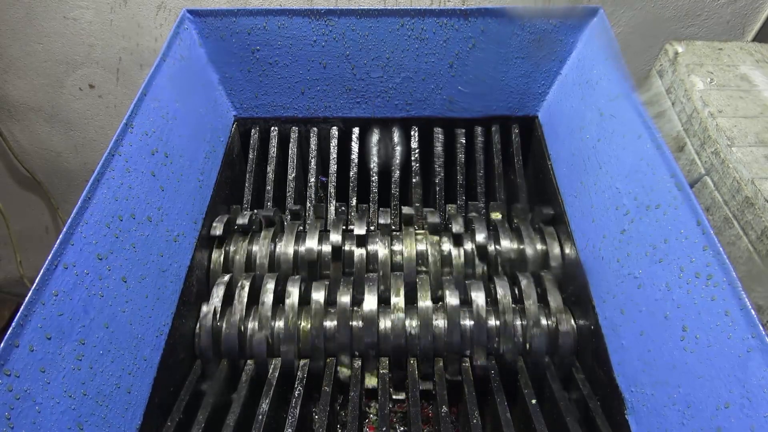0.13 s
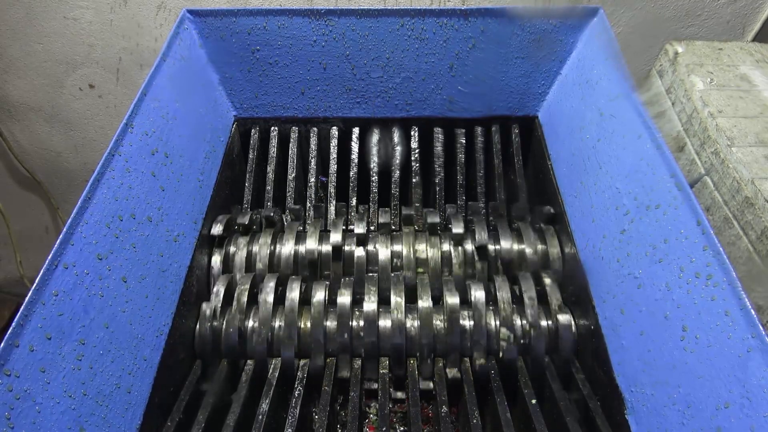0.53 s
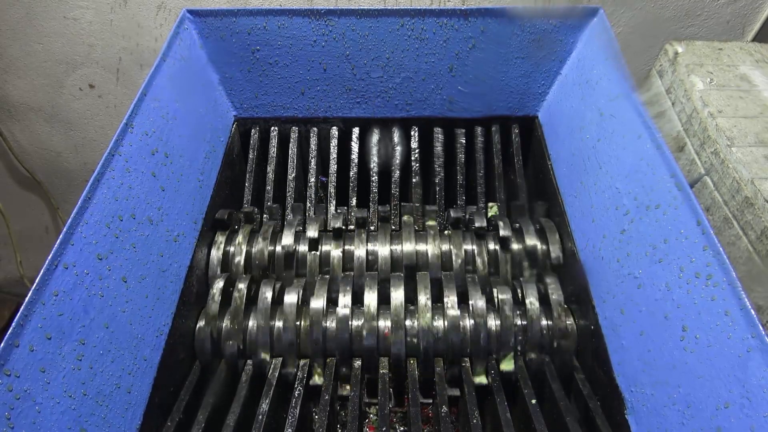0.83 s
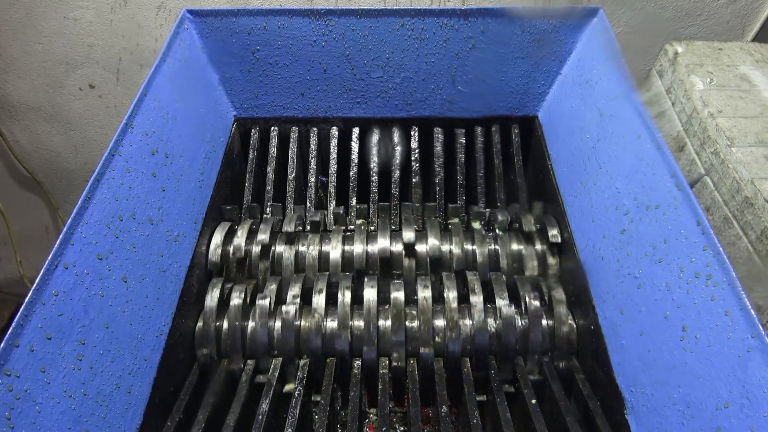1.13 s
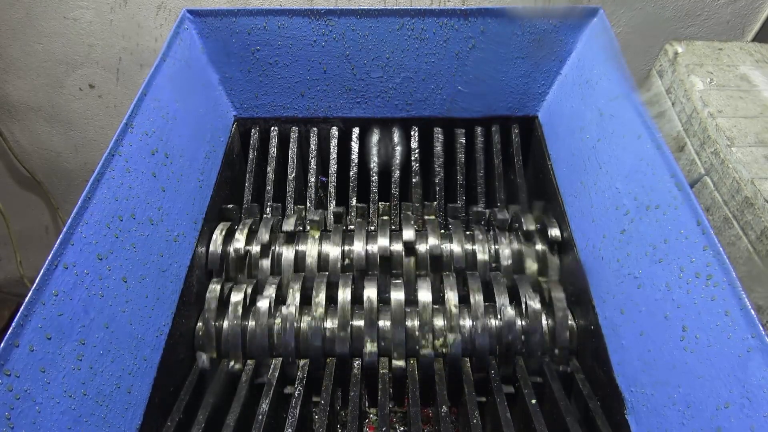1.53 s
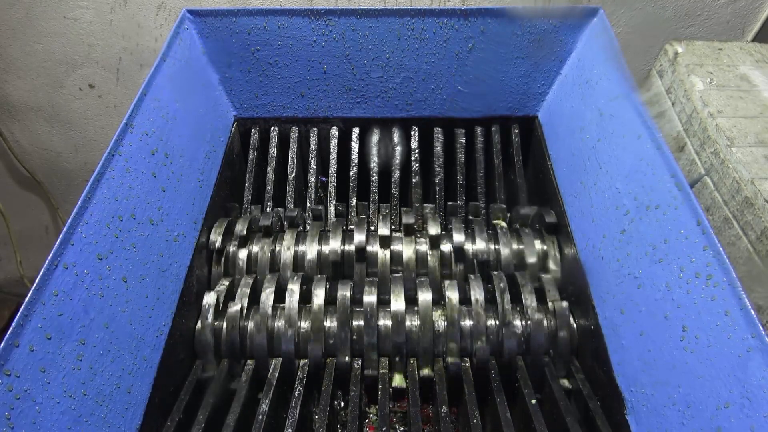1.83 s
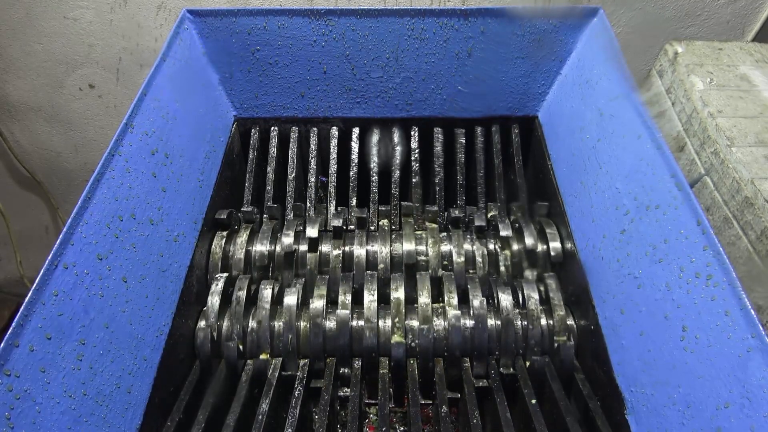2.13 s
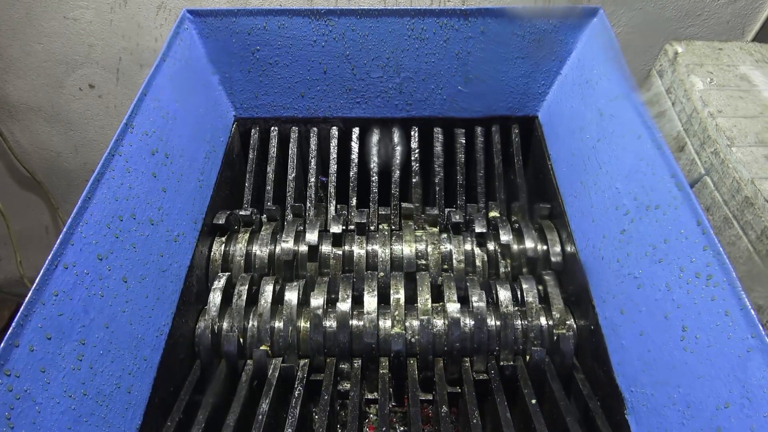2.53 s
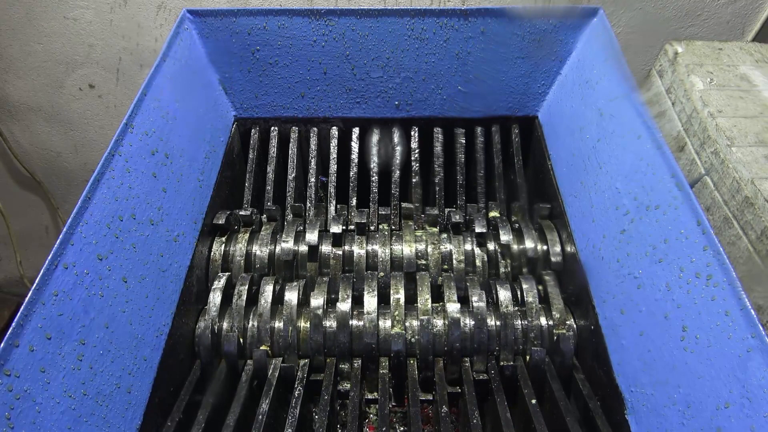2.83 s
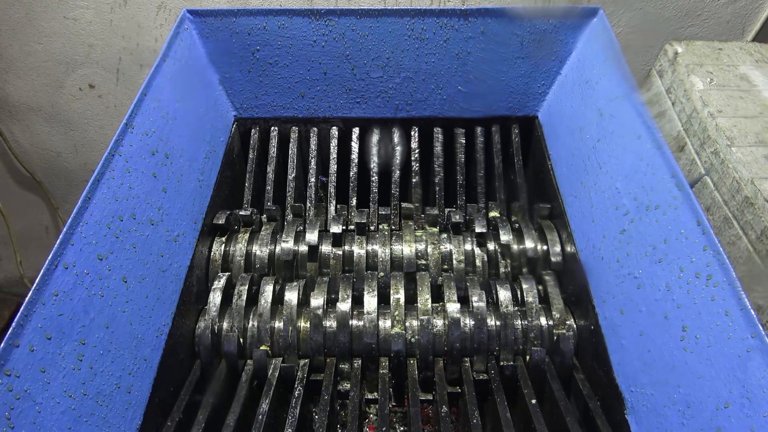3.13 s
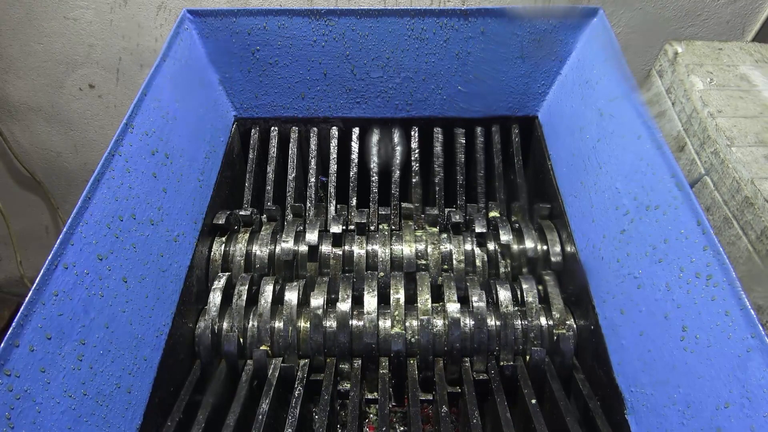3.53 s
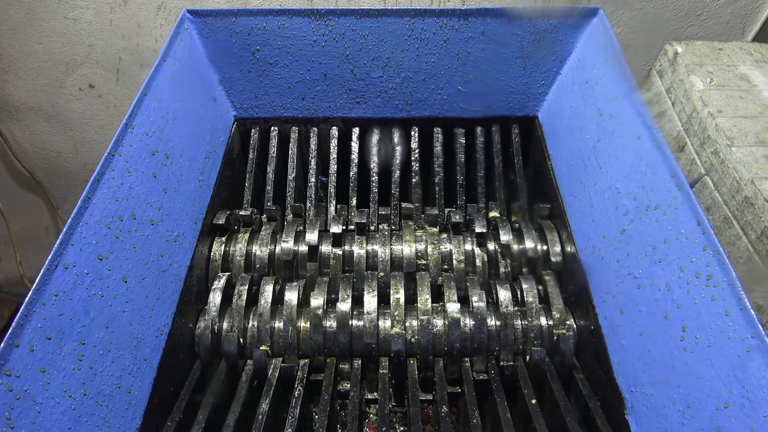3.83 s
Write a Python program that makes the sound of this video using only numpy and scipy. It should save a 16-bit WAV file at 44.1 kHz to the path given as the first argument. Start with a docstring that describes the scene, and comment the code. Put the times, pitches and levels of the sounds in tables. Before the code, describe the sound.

An industrial shredder runs empty in a workshop, heard close: throbbing motor hum, gear whine, rough grinding, metallic squeals and bright cutter snaps, the sharpest near 1.4 s. At about 1.9 s power cuts with heavy clunks; the pitch sags and slack gears chatter until 2.4 s. Quiet room noise remains with faint low hum and rustles, a soft knock at 3.0 s, and a fainter knock with a shuffle at 3.9 s.

```python
"""A twin-shaft shredder runs empty in a workshop: wavering sines make the motor and gear whine, shaped noise
the grinding roar and the scraping, narrow noise bands the squeals, short bright bursts the snapping cutters.
Just before two seconds the power is cut: the frame clunks, the tones sag and die, slack gear teeth chatter.
Then a quiet room of soft noise is left, with faint rustles and low humming sines.
Two soft knocks ring a panel's modes, the second amid a shuffle of noise at the end."""
import sys
import numpy as np
from scipy import signal
from scipy.fft import rfft, irfft, next_fast_len
from scipy.io import wavfile
from scipy.ndimage import uniform_filter1d, map_coordinates

SR = 44100
rng = np.random.default_rng(int(sys.argv[2]) if len(sys.argv) > 2 else 0)


def output_pcm(signal):
    """Save a mono or channel-first signal as 16-bit PCM at the path in sys.argv[1].

    Samples are clipped to [-1, 1] before scaling.
    """
    pcm = np.clip(np.atleast_2d(signal).T, -1, 1) * 32767
    wavfile.write(sys.argv[1], SR, np.round(pcm).astype(np.int16))


N = 176400
T = np.arange(N) / SR  # time of each sample, seconds


def amp(db):
    """Turn decibels into a plain gain."""
    return 10 ** (np.asarray(db) / 20)


def unit(x):
    """Scale a signal to an rms of 1."""
    return x / np.sqrt(np.mean(x ** 2) + 1e-20)


def along(points, hz):
    """Read a curve of (Hz, value) points, joined by straight lines on a log frequency axis."""
    point_hz, value = np.transpose(points)
    return np.interp(np.log(hz + 1), np.log(point_hz + 1), value)


def curves(rows, outside=None):
    """Join the rows in time, one curve per column; outside them use the given value or hold the end ones."""
    seconds, *columns = np.transpose(rows)
    return [np.interp(T, seconds, column, outside, outside) for column in columns]


def wobble(rate):
    """A smooth random curve, with rate new random points a second."""
    points = rng.standard_normal(int(N * rate / SR) + 4)
    return map_coordinates(points, [T * rate])


def filtered(x, response):
    """Multiply the spectrum of x by a response, which is a function of frequency in Hz."""
    size = next_fast_len(N + SR // 2)
    hz = np.fft.rfftfreq(size, 1 / SR)
    return irfft(rfft(x, size) * response(hz), size)[..., :N]


# How alike left and right noise are. Each row: frequency in Hz, likeness (1 same, 0 unrelated, below 0 opposed).
ALIKE = [(600, .98), (800, .86), (1050, .98), (2500, .76), (4200, .97), (5500, .9), (7200, .2), (8500, .35),
         (11000, -.1)]


def rush(spectrum, patchy_db):
    """Stereo noise of rms 1, coloured by a spectrum, with random louder and softer patches."""
    cells = signal.stft(rng.standard_normal((2, N)), nperseg=512)[2]
    patches = rng.standard_normal(cells.shape[1:])
    patches = uniform_filter1d(patches, 4, 0)  # smooth over frequency
    patches = uniform_filter1d(patches, 8, 1)  # smooth over time
    pair = signal.istft(cells * amp(patchy_db * unit(patches)), nperseg=512)[1][:, :N]

    def mid_side(hz):
        # a larger angle gives more side signal, so less likeness
        angle = np.arccos(np.clip(along(ALIKE, hz), -1, 1)) / 2
        return amp(along(spectrum, hz)) * [np.cos(angle), np.sin(angle)]

    mid, side = filtered(pair, mid_side)
    return unit(np.array([mid + side, mid - side]))


def tone(hz, waver_db, rate, drift):
    """A sine of rms about 1 whose level (dB) and phase (radians) waver at random."""
    cycles = np.cumsum(hz + 0 * T) / SR + rng.random()
    phase = 2 * np.pi * cycles + drift * wobble(rate)
    return np.sqrt(2) * amp(waver_db * wobble(rate)) * np.sin(phase)


def strike(events, modes, rise_s=0.0021, rough=0.0416):
    """Every blow rings the modes anew, each with an unsteady phase; brighter blows favour the upper modes."""
    out, t = np.zeros(N + SR), T[:SR // 3]
    for start, db, bright_db in events:
        ring = 0
        for hz, mode_db, t60 in modes:
            octaves = np.log2(hz / modes[1][0])  # counted from the second mode
            level = mode_db + bright_db * octaves + rng.normal(0, 1.67) - 60 * t / t60
            stray = uniform_filter1d(np.cumsum(rng.normal(0, rough, len(t))), size=120)
            ring = ring + amp(level) * np.sin(2 * np.pi * hz * t + stray)
        out[round(start * SR):][:len(t)] += amp(db) * (1 - np.exp(-t / rise_s)) * ring
    return out[:N]


SHAFT_HZ = 24.8  # turns per second before the cut
CUT_S, MOTOR_T60, WHINE_T60 = 1.941, 0.98, 0.49  # power cut, then seconds to fall by 60 dB
SAG_PER_S = 0.16  # share of pitch lost per second after the cut
SHAFT_WAVER_DB, SHAFT_DRIFT = 1.2, .15  # level in dB, phase in radians
WHINE_WAVER_DB, WHINE_DRIFT = 1.2, .45
BEAT_HZ, BEAT_DEPTH = 11, 0.24  # the whine throbs as the cutter hooks load the gears
# Motor shaft tones. Each row: multiple of the shaft speed, level in dB before the load.
ORDERS_DB = [(4, -47), (5, -36), (6, -46.5), (8, -53.5), (9, -36.5), (10, -45.5), (11, -46), (13, -47.5),
             (14, -48), (15, -49), (17, -49), (22, -46.5), (23, -47.5), (24, -42), (27, -56)]
# Magnetic hum of the motor. Each row: frequency in Hz, level in dB while powered.
MAINS = [(299.7, -42)]
# Gear tooth tones. Each row: frequency in Hz before the cut, level in dB before the load.
WHINE = [(920.5, -54), (1015.3, -38.5), (1077.5, -39.5), (1170, -50.5), (1276, -53), (1600, -47.5),
         (1685, -52), (1842, -71), (2166, -53), (2186, -61.5), (3768, -57), (4511, -62.5)]
# How the load moves the levels. Each row: time in seconds, change of the shaft tones in dB, of the whine in dB.
LOAD = [(0, -2, 1), (.15, -1.5, 0.5), (.5, -0.3, -1), (.75, 0, 3), (1.0, 0.5, -1.5), (1.2, 1, 0),
        (1.45, -3.1, 0.5), (1.9, -1.3, 0)]


def motor():
    """Shaft and gear tones follow the turning speed, so they sag after the cut; all tones and hum die away."""
    off = np.maximum(T - CUT_S, 0)  # seconds since the cut
    speed = 1 - SAG_PER_S * off
    shaft_load_db, whine_load_db = curves(LOAD)
    low, whine = 0, 0
    for multiple, db in ORDERS_DB:
        hz = multiple * SHAFT_HZ * speed
        low = low + amp(db + shaft_load_db) * tone(hz, SHAFT_WAVER_DB, 4.05, SHAFT_DRIFT)
    for hz, db in MAINS:
        low = low + amp(db) * tone(hz, SHAFT_WAVER_DB, 4.55, SHAFT_DRIFT)
    for hz, db in WHINE:
        beat_phase = 2 * np.pi * (BEAT_HZ * T + rng.random()) + wobble(3.27)
        beat = 1 + BEAT_DEPTH * np.sin(beat_phase)
        whine = whine + amp(db + whine_load_db) * beat * tone(hz * speed, WHINE_WAVER_DB, 16, WHINE_DRIFT)
    return low * amp(-60 * off / MOTOR_T60) + whine * amp(-60 * off / WHINE_T60)


RUMBLE_DB, GRIND_DB = -13, -3  # added to those two levels
# The roar over time, before the trims above and the fade.
# Each row: time in seconds, level of the rumble in dB, of the grinding in dB, of the hiss in dB.
ROAR = [(0.0, -49, -32, -48), (0.16, -25, -32, -49.5), (0.28, -28, -32.5, -45), (0.47, -23.5, -34.5, -51),
        (0.66, -36, -32, -49.5), (1.1, -28.5, -34.5, -48.5), (1.18, -23, -33.5, -47.5),
        (1.59, -27.5, -30, -49.5), (1.89, -22.5, -35, -47.5), (1.95, -29, -32, -47), (2.13, -44, -33, -56),
        (2.15, -33.5, -36.5, -58), (2.28, -34.5, -42.5, -63.5), (2.37, -33, -46.5, -70),
        (2.48, -44, -55, -84), (2.57, -48, -59, -74), (2.8, -51, -67, -94)]
# Colours of the three noises. Each row: frequency in Hz, relative strength in dB per Hz.
RUMBLE = [(15, -39), (30, -18), (55, -13.5), (85, -11.5), (150, -6.5), (181, -7.5), (230, -1.5), (310, -5),
          (400, -4), (480, -8), (600, -39), (900, -120)]
GRIND = [(220, -54), (380, -21.5), (461, -12), (577, -4), (712, -14.5), (816, -17.5), (936, -12),
         (1010, -6), (1050, 1.5), (1100, -10.5), (1180, -8), (1430, -14.5), (1630, -10), (1960, -15.5),
         (2230, -23.5), (2600, -31), (3380, -41), (5720, -120)]
HISS = [(1410, -20), (2400, -5.5), (2710, -6.5), (3250, -9), (3810, -2), (4280, -1), (4640, -9.5),
        (5230, -8), (7000, -15), (9100, -82), (15400, -120)]


def roar():
    """Many small rough contacts add up to noise: rumble, grinding and hiss, the last two fluttering fast."""
    rumble_db, grind_db, hiss_db = curves(ROAR)
    fade = amp(-60 * np.maximum(T - 2.55, 0) / 1.2)

    def throb(depth):
        return 1 + depth * np.sin(2 * np.pi * 3.3 * SHAFT_HZ * T + wobble(4.83))

    rumble = amp(rumble_db + RUMBLE_DB) * rush(RUMBLE, patchy_db=2.0)
    grinding = amp(grind_db + GRIND_DB) * throb(0.064) * rush(GRIND, patchy_db=2.0)
    hiss = amp(hiss_db) * throb(0.045) * rush(HISS, patchy_db=2.0)
    return fade * (rumble + grinding + hiss)


SNAP_T60, SNAP_TAIL_DB, SNAP_RISE_S = .03, -8, .004  # ring decay in seconds, burst level, burst rise
# Cutters rubbing. Each row: time in seconds, level in dB before a small random wobble.
SCRAPE = [(0.0, -60.5), (0.13, -57.5), (0.33, -46), (0.49, -50), (0.56, -54), (0.67, -51), (1.15, -59),
          (1.88, -56), (1.98, -48), (2.31, -74.5), (2.4, -83)]
# Colour of the rubbing steel. Each row: frequency in Hz, relative strength in dB per Hz.
STEEL = [(3820, -33.5), (6500, -3.5), (6800, -2.5), (8430, 0), (8880, -12), (10100, -10), (11200, -8),
         (11900, -10), (13300, -15), (15000, -7), (15800, -29)]
# Cutters snapping past each other. Each row: time in seconds, base level in dB, pitch of the ring in Hz.
SNAPS = [(0.268, -35.5, 7040), (0.344, -38.5, 8930), (0.4228, -31, 8560), (0.6315, -40, 7900),
         (0.745, -40, 7680), (1.0026, -42.5, 7030), (1.411, -25.5, 8700), (1.7765, -48, 7000),
         (1.9272, -34, 8950), (1.9515, -33.5, 7840), (1.985, -41.5, 7850)]


def cutters():
    """Discs rub in gritty patches of noise; each snap is a short ringing sine and a burst of noise."""
    [level_db] = curves(SCRAPE, -120)
    rub = amp(level_db + 0.84 * wobble(120)) * rush(STEEL, patchy_db=8.5)
    burst, ring = np.zeros(N), np.zeros(N)
    for start, db, hz in SNAPS:
        t = np.maximum(T - start, 0)
        ring_level = (1 - np.exp(-t / 0.0003)) * amp(db + 1.0 - 60 * t / SNAP_T60)
        ring += ring_level * np.sin(2 * np.pi * hz * t)
        swell = np.exp(np.minimum(T - start, 0) / SNAP_RISE_S)  # the noise grows up to the snap
        burst += swell * amp(db + SNAP_TAIL_DB - 60 * t / 0.2)
    return rub + ring + burst * rush(STEEL, patchy_db=4.0)


SQUEAL_DB = -5.5  # added to every squeal level
# Narrow metallic squeals. Each row: frequency in Hz, width in Hz.
SQUEAL_BANDS = [(515, 44), (1640, 115), (1845, 22), (3740, 140), (4550, 193)]
# How they come and go. Each row: time in seconds, then the level of each band in dB before the trim above.
SQUEAL = [(0.0, -68, -32, -32, -59, -56), (0.32, -43.5, -39.5, -42.5, -48.5, -44.5),
          (0.89, -33.5, -44, -42.5, -56, -52), (1.11, -39, -47, -52, -52, -74),
          (1.48, -38, -34.5, -43, -45, -46), (1.84, -49, -37.5, -42, -47, -52.5),
          (1.99, -44, -47, -57, -63, -41), (2.05, -30.5, -34.5, -45, -80, -50.5),
          (2.21, -40, -42, -76, -67, -60), (2.25, -37, -77, -75, -76, -61), (2.4, -62, -72, -81, -91, -74)]


def squeals():
    """Rubbing steel sings in a few narrow bands: noise through resonances, each with its own level curve."""
    out = 0
    for (centre, width), level_db in zip(SQUEAL_BANDS, curves(SQUEAL, -120)):
        def resonance(hz):
            return (hz * width / (centre ** 2 - hz ** 2 + 1j * hz * width)) ** 2

        band = filtered(rng.standard_normal(N), resonance)
        out = out + amp(level_db + SQUEAL_DB) * unit(band)
    return out


TOOTH_RISE_S, KNOCK_ROUGH = .005, .09  # rise in seconds, phase unsteadiness in radians per sample
# Clunks of the frame. Each row: time in seconds, level in dB, brightness in dB per octave.
CLUNKS = [(1.924, -21, -2), (1.937, -19.5, -2), (1.962, -19.5, -0.5), (1.985, -24.5, 2), (2.005, -38, 6),
          (2.027, -24.5, 1)]
# Ringing modes of the frame. Each row: frequency in Hz, relative level in dB, seconds to fall by 60 dB.
FRAME = [(132.7, -16.5, 0.67), (184.7, -1.5, 0.2), (220, -8.5, 0.22), (315, -4, 0.098), (607, -6, 0.12),
         (651, -11, 0.11), (740, -7.5, 0.1), (874, -13, 0.1)]
# Slack gear teeth knocking. Each row: time in seconds, level in dB, brightness in dB per octave.
TEETH = [(2.030, -27, -5), (2.052, -24.5, 0), (2.095, -35, 5), (2.107, -24, -15), (2.127, -23.5, -3),
         (2.166, -30, 0.5), (2.195, -33, 5), (2.235, -27, 1), (2.255, -27, 2), (2.277, -29.5, 7.5),
         (2.320, -30, -8), (2.400, -40, 1)]
# Ringing modes of the casing. Each row: frequency in Hz, relative level in dB, seconds to fall by 60 dB.
CASING = [(435, -9, 0.085), (508.3, 0, 0.14), (558, -10, 0.15), (1049, -4, 0.13), (1630, -22, 0.089)]


def stopping():
    """Blows ring the metal: the frame clunks, then slack gear teeth knock the casing."""
    clunks = strike(CLUNKS, FRAME)
    chatter = strike(TEETH, CASING, TOOTH_RISE_S, KNOCK_ROUGH)
    return clunks + chatter


# Two soft knocks. Each row: time in seconds, level in dB, brightness in dB per octave.
KNOCKS = [(3.0295, -36, 5.5), (3.906, -58, 0)]
# Ringing modes of the panel. Each row: frequency in Hz, relative level in dB, seconds to fall by 60 dB.
PANEL = [(420, -9, .45), (465, -12, .55), (515, -11, .4), (510, 0, .05), (1000, -18, .2)]


def knocks():
    """Two blows make a panel ring in its own modes."""
    return strike(KNOCKS, PANEL, rough=KNOCK_ROUGH)


# Two humming tones. Each row: time in seconds, frequency in Hz, level in dB before a slight waver.
HUM = [(2.55, 134.2, -58), (2.828, 130.6, -65.5), (2.868, 122.6, -54), (2.948, 123, -80),
       (3.002, 130, -56.5), (3.092, 130.7, -67), (3.45, 125.2, -58), (3.61, 124, -54.5),
       (3.754, 122.8, -59), (3.85, 124, -69)]
LOW_HUM = [(2.3, 95.4, -57), (2.5, 97, -58), (2.6, 95.5, -68), (2.9, 94.6, -60.5), (2.97, 94, -71),
           (3.17, 87, -67), (3.5, 79.8, -67), (3.6, 80.3, -88)]


def far_hum():
    """Two low, far hums whose pitch wanders, on the whole downward."""
    out = 0
    for rows in (HUM, LOW_HUM):
        hz = curves(rows)[0]
        level_db = curves(rows, -120)[1]
        out = out + amp(level_db) * tone(hz, waver_db=1, rate=6, drift=.1)
    return out


ROOM_DB, SHUFFLE_LOW_DB = -57.5, -4  # room noise level, trim of the low shuffle
RUSTLE_S, LOOSE_PATCHY_DB = .017, 1  # half-length of a rustle in seconds, unevenness in dB
# Faint rustles. Each row: time in seconds, level in dB at its height.
RUSTLES = [(2.56, -74), (2.92, -73), (3.14, -69), (3.2, -72), (3.325, -68), (3.41, -70), (3.47, -73),
           (3.555, -71), (3.86, -70)]
# The shuffle. Each row: time in seconds, level of its low part in dB before the trim, of its high part in dB.
SHUFFLE = [(3.814, -86, -96), (3.892, -80, -88), (3.91, -45, -67), (3.93, -49.5, -57), (4.0, -49.5, -63)]
# Colours of the noises. Each row: frequency in Hz, relative strength in dB per Hz.
ROOM = [(15, -42), (40, -3), (69, -10.5), (125, -14.5), (175, -10), (215, -16), (301, -13.5), (354, -19.5),
        (501, -11), (769, -19.5), (879, -10), (1180, -13.5), (1310, -11.5), (1460, -29.5), (1630, -25.5),
        (2370, -37), (3350, -41.5), (4620, -37), (10600, -39.5), (15000, -49)]
RUSTLE = [(3000, -60), (3600, -6), (4500, -3), (6000, -7), (8000, -6), (12000, -11), (13500, -60)]
SHUFFLE_LOW = [(90, -56), (150, 9), (220, 0.5), (320, -2.5), (480, 5), (600, 0), (780, -23), (1000, -11),
               (1400, -43), (1900, -55)]
SHUFFLE_HIGH = [(900, -50), (1400, -12), (1620, 2), (1880, -12), (2140, -9), (2820, -15), (4670, -10),
                (9250, -17), (12000, -28), (15600, -60)]


def workshop():
    """Coloured noise: steady for the room, in short puffs for the rustles, in two parts for the shuffle."""
    room = amp(ROOM_DB) * rush(ROOM, patchy_db=2.0)
    puffs = sum(amp(db) * np.exp(-((T - start) / RUSTLE_S) ** 2) for start, db in RUSTLES)
    rustles = puffs * rush(RUSTLE, LOOSE_PATCHY_DB)
    low_db, high_db = curves(SHUFFLE, -120)
    shuffle = amp(low_db + SHUFFLE_LOW_DB) * rush(SHUFFLE_LOW, patchy_db=-0.5)
    shuffle += amp(high_db) * rush(SHUFFLE_HIGH, LOOSE_PATCHY_DB)
    return room + rustles + shuffle


HALL_DB, TONES_HALL_DB = -9, -21.5  # how much of the blows and of the tones goes into the echo
# How long the room echoes. Each row: frequency in Hz, seconds to fall by 60 dB.
HALL = [(150, 0.67), (1000, 0.2), (4000, 0.15), (10000, 1)]


def hall(x):
    """The room's echo is a tail of noise in which each frequency dies at its own speed."""
    hz, t, cells = signal.stft(rng.standard_normal((2, SR)), SR, nperseg=256)
    fading = cells * amp(-60 * t / along(HALL, hz)[:, None])
    tail = signal.istft(fading, SR, nperseg=256)[1]
    late = np.pad(x, (500, 0))[None]  # the echo starts 500 samples later
    return signal.fftconvolve(late, tail / np.linalg.norm(tail[0]), axes=1)[:, :N]


def scene():
    """Add the sources together; the blows and the tones also feed the echo."""
    hits = stopping() + knocks()
    tones = motor() + squeals()
    echo = hall(amp(HALL_DB) * hits + amp(TONES_HALL_DB) * tones)
    return hits + tones + echo + roar() + cutters() + workshop() + far_hum()


TOP_HZ = 15750  # nothing is kept from here up
# How the sound leans to one side. Each row: frequency in Hz, left minus right in dB.
LEAN = [(60, -3.5), (225, -6.9), (600, -2.2), (1080, -.6), (1200, 3.5), (1400, -1.5), (1600, 3),
        (1750, 2.5), (1850, 9.5), (1980, 3.2), (2500, .3), (6000, .1)]


def record(dry):
    """Two ports of unequal response, each taking half of the lean, and a band limit."""
    side = np.array([[.5], [-.5]])
    return filtered(dry, lambda hz: amp(side * along(LEAN, hz)) * (hz < TOP_HZ))


dry = scene()
out = record(dry)
output_pcm(out)
```